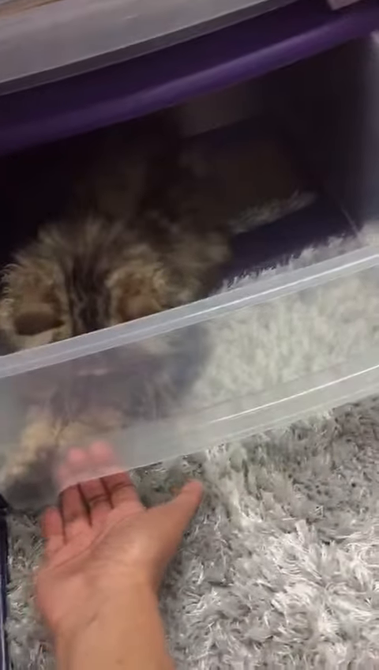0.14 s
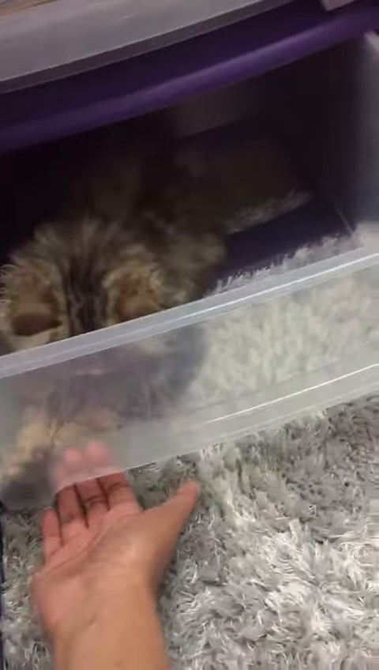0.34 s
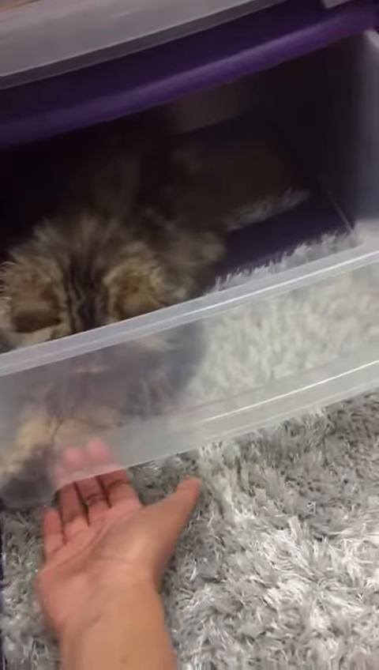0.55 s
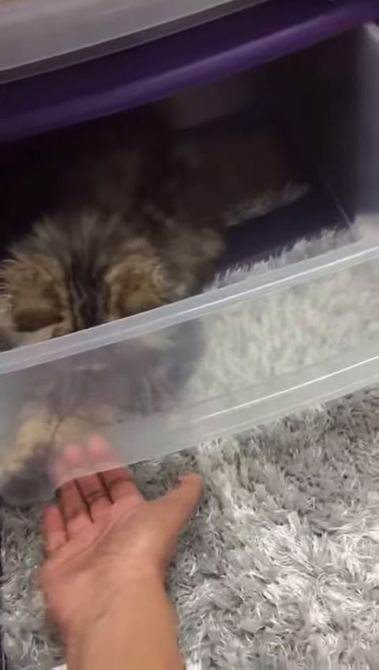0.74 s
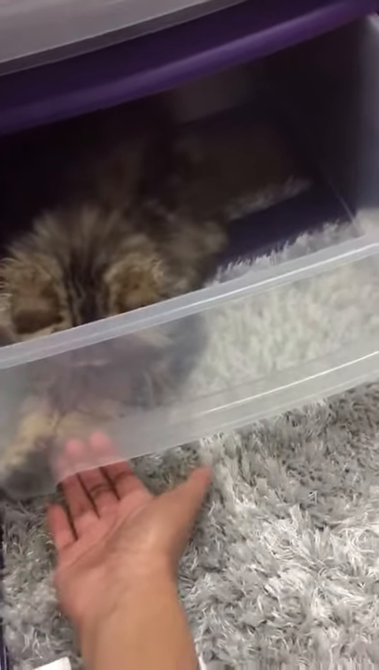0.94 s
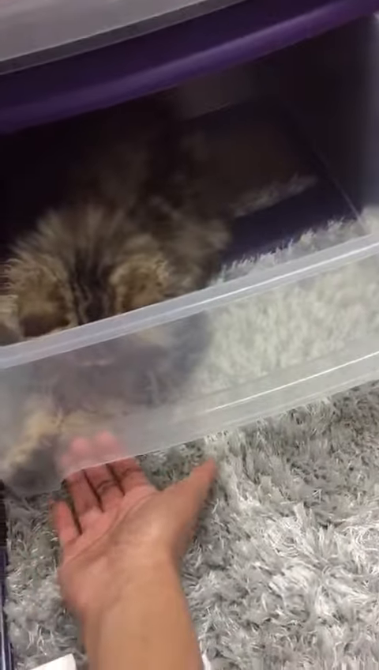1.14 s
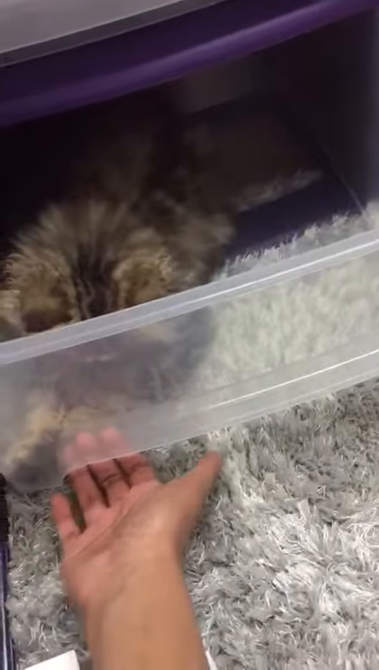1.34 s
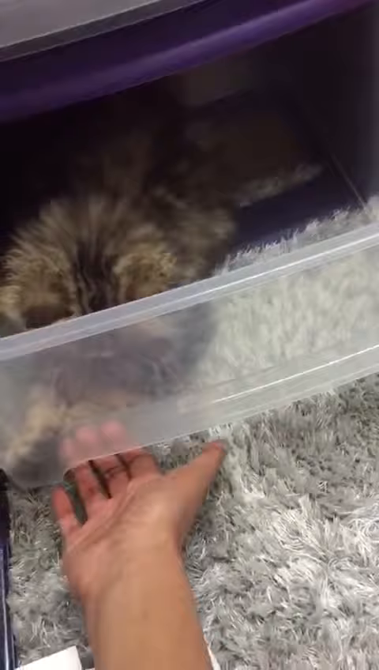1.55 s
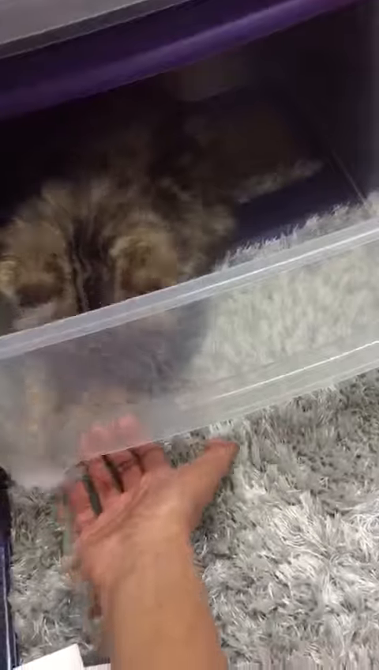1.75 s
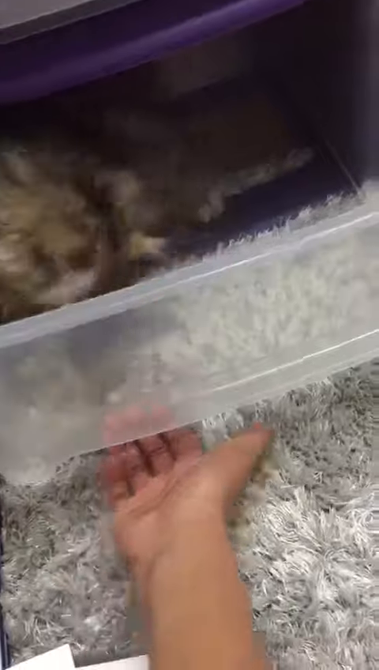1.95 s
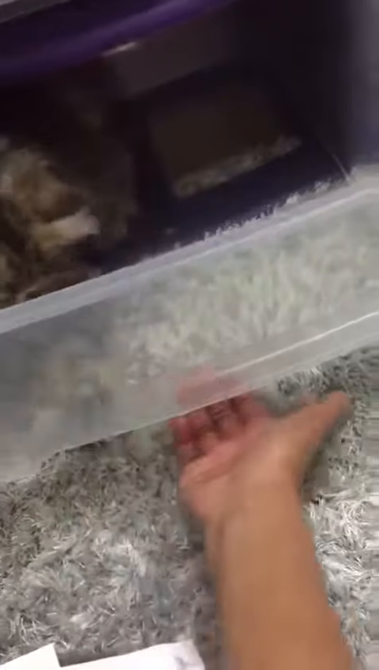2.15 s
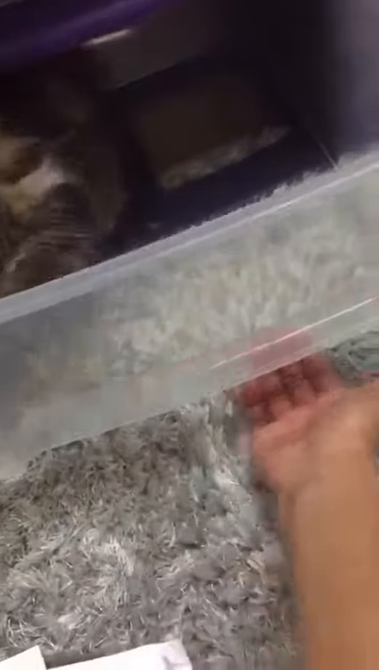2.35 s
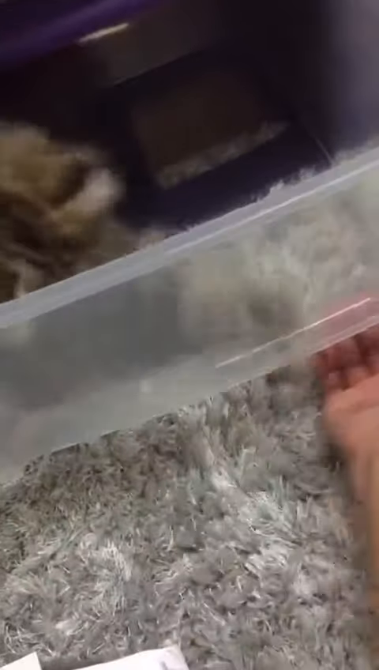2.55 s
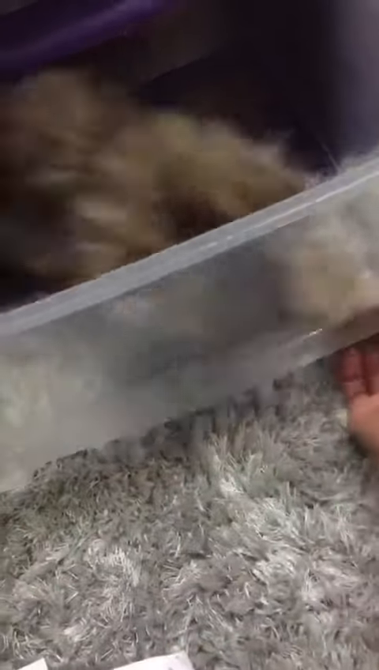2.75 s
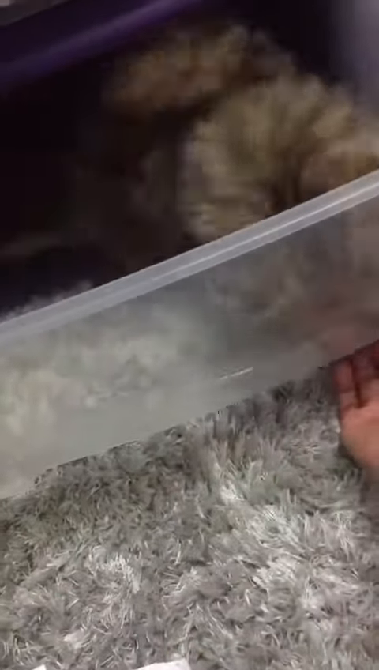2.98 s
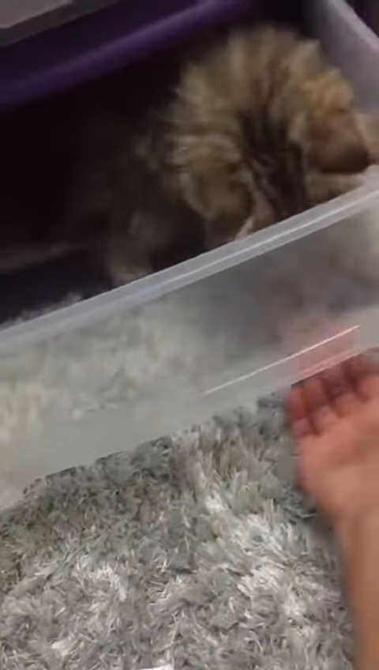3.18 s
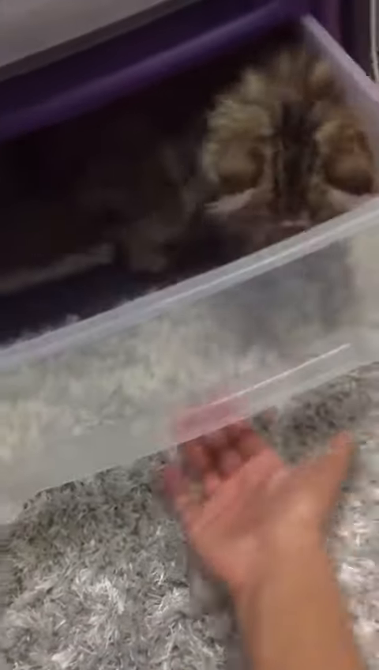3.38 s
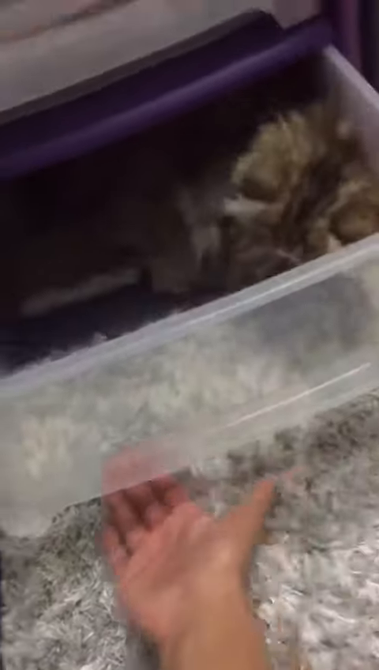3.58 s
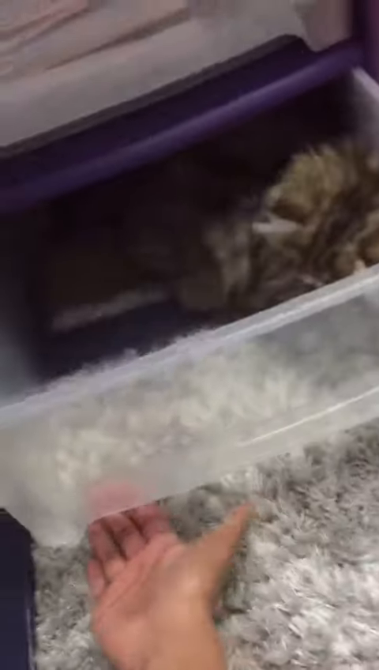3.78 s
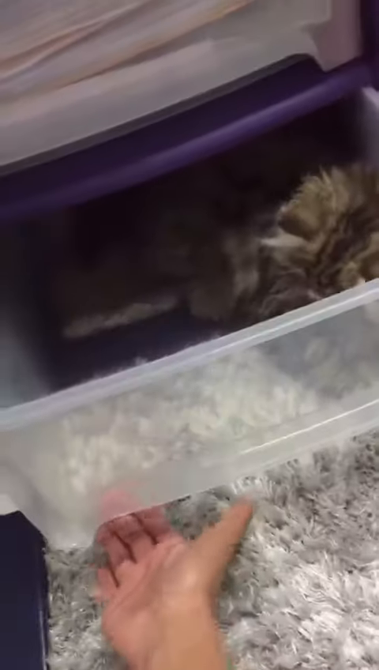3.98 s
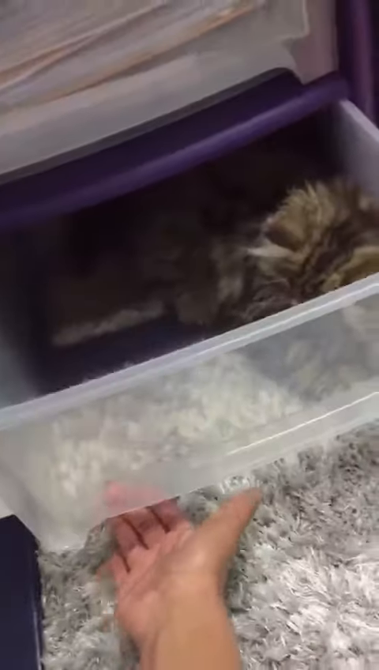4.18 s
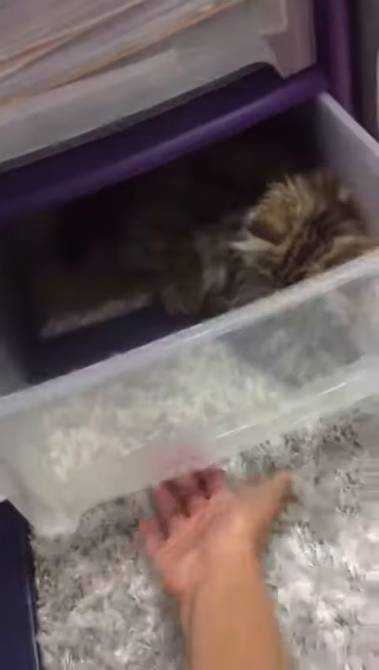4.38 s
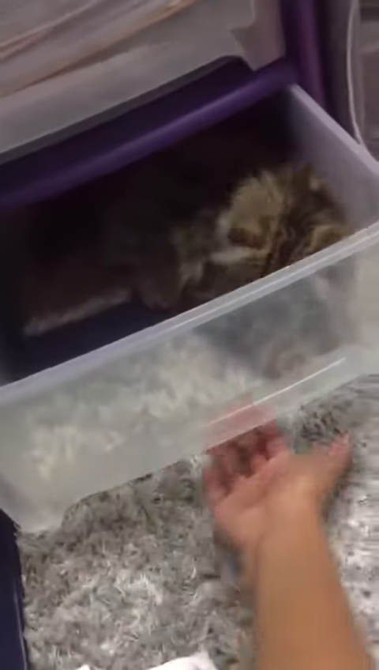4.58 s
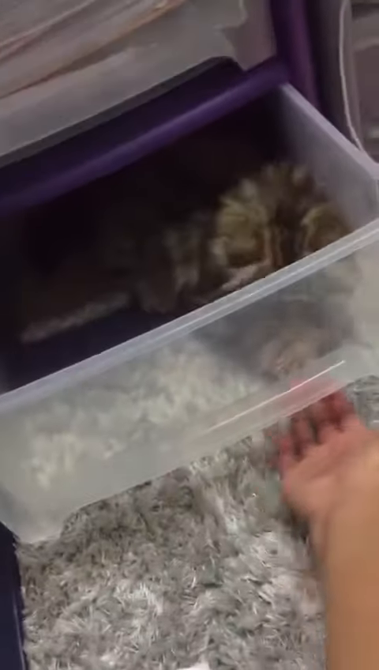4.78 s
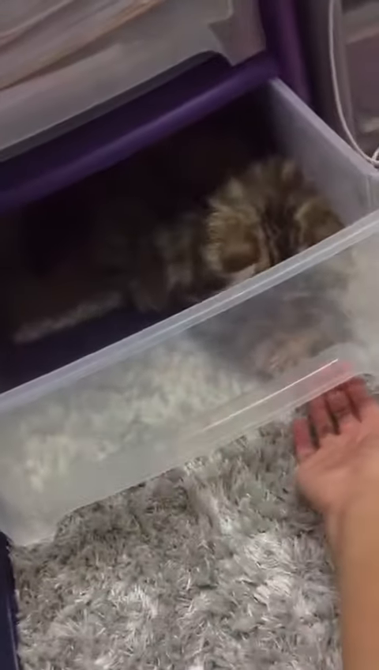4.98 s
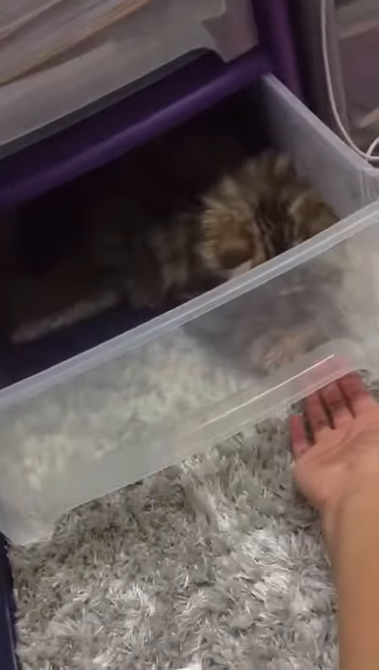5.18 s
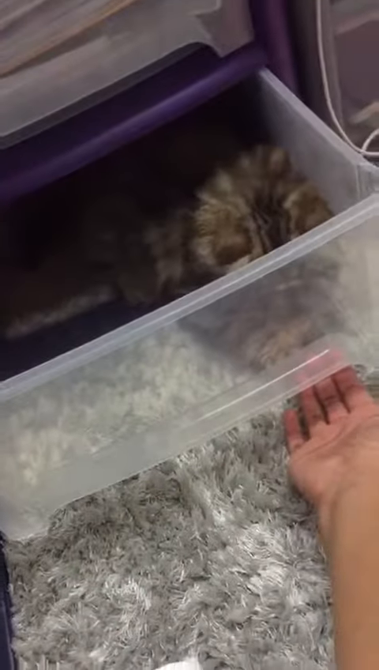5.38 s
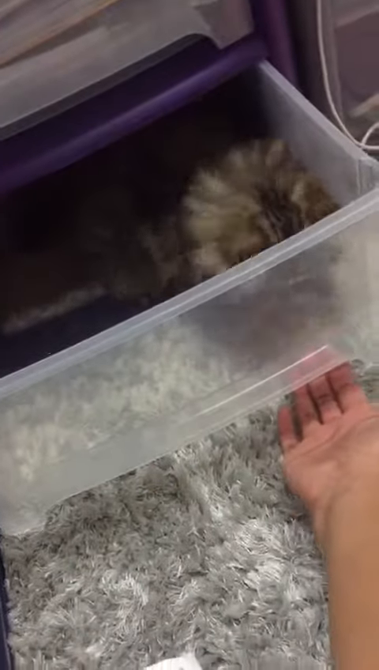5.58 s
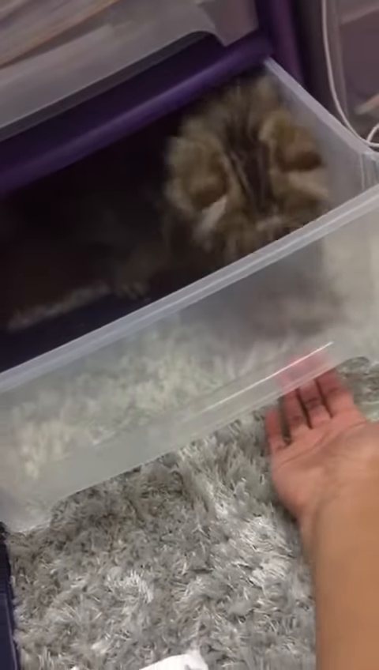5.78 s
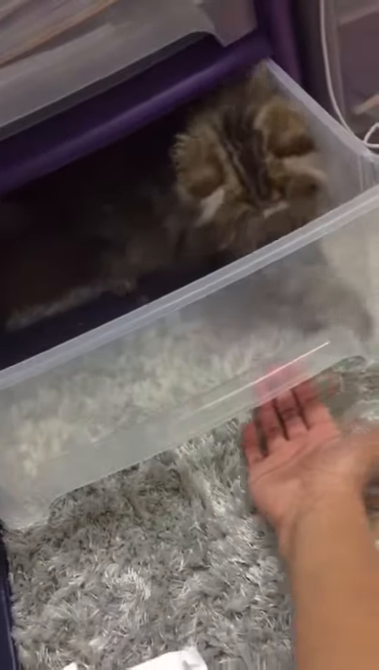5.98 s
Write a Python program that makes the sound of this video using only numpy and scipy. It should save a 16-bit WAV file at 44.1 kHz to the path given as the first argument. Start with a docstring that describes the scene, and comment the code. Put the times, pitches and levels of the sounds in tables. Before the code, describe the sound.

Fingertips drum hollow knocks on a plastic drawer front while a kitten inside answers with soft paw thumps and quick claw ticks in a quiet room.

```python
"""In a small furnished room, fingers drum on the front of a clear plastic drawer that stands open on a carpet.
Taps ring the modes of the front, with a nail click on top, and bending waves make each one chirp down.
A kitten inside pounces after them: paws thump the drawer floor, claws tick on the wall as short noise bursts,
its shifting weight rumbles and scrapes, and fur hisses along the plastic. The harder a contact, the brighter.
The room answers each tap, claw and pawfall briefly, above quiet air and a faint hum."""
import sys
import numpy as np
from scipy import signal
from scipy.fft import rfft, irfft, next_fast_len
from scipy.io import wavfile
from scipy.ndimage import map_coordinates

SR = 44100
rng = np.random.default_rng(int(sys.argv[2]) if len(sys.argv) > 2 else 0)


def dump_mix(stems):
    """Bounce the given channels to the path in sys.argv[1] as a 16-bit WAV at rate SR."""
    frames = np.atleast_2d(stems).T  # one column per channel
    limited = np.clip(frames, -1, 1)  # hard clip at full scale
    pcm = np.round(limited * 32767).astype(np.int16)
    wavfile.write(sys.argv[1], SR, pcm)


N = 265919
AGE = np.arange(SR // 4) / SR  # time since a contact, s
TOP_HZ = 11900  # upper band limit

# finger taps on the drawer front, by soft pad or hard nail:
# [t/s, strength/dB, hardness/(dB per octave), spot level/dB]
FINGER_TAPS = [(1.514, -47.5, .3, 2), (1.652, -31, .3, 0), (1.768, -22.5, 0.45, -0.5), (1.873, -30, 1.6, 3),
               (1.973, -18, 0, 1), (2.068, -19, -4, -8), (2.167, -17, -1, 0.5), (2.219, -31.5, -1.5, -2),
               (2.341, -18.5, -2, 2), (2.531, -16.5, 1.15, -3), (2.89, -21.5, 2.5, 0),
               (3.101, -17.5, 0.33, -3), (3.477, -16.5, 0, 4.5), (3.708, -18.5, 1.25, 2),
               (3.919, -22.5, 3, 0.5), (4.154, -18.5, 2, -4), (4.415, -22, -7, -15),
               (4.641, -16, -3.5, 0.5), (4.734, -38.5, -7, 3)]
# modes of the drawer front: [nominal f/Hz, mean level/dB, t60/s]
FRONT_MODES = [(119.7, -14.5, 0.14), (193, -14, 0.027), (378.5, 1, 0.039), (406.5, -21, 0.19),
               (516, -31, 0.024), (657, 1, 0.02), (661.7, -19.5, 0.13), (814, -13, 0.012),
               (850, -28.5, 0.11), (864, 1.5, 0.015), (1428, -5, 0.014), (1650, -9, 0.018),
               (2045, 1.5, 0.01), (2260, -5, 0.01), (2950, -4, 0.0071)]
# force of an average finger tap: [f/Hz, level/dB]
FINGER_FORCE = [(400, 5), (650, -0.5), (1000, -3.5), (1500, -6), (2500, -5.5)]
# spectrum shape of a nail click: [f/Hz, level/dB]
NAIL_SPECTRUM = [(600, -7.5), (1500, 3), (2150, 3.5), (2550, -15), (3200, -0.5), (4500, -1.5), (6500, 1),
                 (8500, -7), (11500, -11.5)]
# the spot that is hit favours or starves the panel modes in this range
SPOT_LOW_HZ, SPOT_HIGH_HZ = 520, 1200
# click level against the knock; dB it gains per unit of hardness (octaves above the knock)
NAIL_DB, NAIL_OCTAVES = -9.5, 2.7
NAIL_TILT_SHARE = 0.47  # share of the hardness that also tilts the click's own spectrum


def finger_taps():
    """Modal excitation: a thin panel knocks hollowly, weighted by the spot hit, under a nail click."""
    track = np.zeros(N)
    for s, db, hardness, spot_db in FINGER_TAPS:
        force = []
        for hz, level in hardened(FINGER_FORCE, hardness, pivot_hz=395):
            near_spot = SPOT_LOW_HZ < hz < SPOT_HIGH_HZ
            force.append((hz, level + spot_db * near_spot))
        knock = ring(FRONT_MODES, force, scatter_db=1.5, detune=0.012, swell=0.046)
        nail = hardened(NAIL_SPECTRUM, NAIL_TILT_SHARE * hardness, pivot_hz=4000)
        click = amp(NAIL_DB + NAIL_OCTAVES * hardness) * crack(nail, t60=0.016)
        add(track, s, amp(db) * in_room(knock + click, wet_db=0.5))
    return bending(track, lag=0.001652)


# paws landing on the drawer floor: [t/s, strength/dB, hardness/(dB per octave)]
PAWFALLS = [(1.018, -39, -0.5), (1.13, -46, 1.5), (1.172, -48, 2), (1.73, -39, -1.5), (2.223, -42, -14),
            (2.321, -29, 0), (2.444, -36.5, -1), (2.617, -21.5, 3), (2.643, -23, 2), (2.677, -25, -1),
            (2.847, -17.5, 2.5), (2.87, -20, 0), (3.045, -26, -1), (3.388, -41.5, -4.5),
            (3.82, -31.5, -2.5), (3.959, -33.5, 3.5), (4.043, -33.5, -0.5), (4.098, -37, 7),
            (4.295, -28.5, -2), (4.366, -34.5, 2.5), (4.413, -37, -2), (4.784, -48, -2),
            (5.674, -28.5, 2.5), (5.702, -30.5, -1.5)]
# modes of the drawer floor and its cavity: [nominal f/Hz, mean level/dB, t60/s]
FLOOR_MODES = [(61.1, -16, 0.2), (105.5, 2, 0.15), (144.5, -2.5, 0.16), (186.8, -8, 0.21),
               (251, -0.5, 0.082), (323, -11.5, 0.14), (380.5, -7, 0.097), (453, -29, .04),
               (625, -14.5, 0.057), (896, -21.5, 0.042), (1093, -23.5, 0.025)]
# force of an average pawfall: [f/Hz, level/dB]
PAD_FORCE = [(62, 2.5), (105, 2.5), (140, 0), (240, -3.5)]


def paws():
    """Modal excitation: soft pads thump mainly the low modes of the drawer floor, and their force, level above
    240 Hz, also stirs its mid-range modes."""
    track = np.zeros(N)
    for s, db, hardness in PAWFALLS:
        force = hardened(PAD_FORCE, hardness, pivot_hz=125)
        thump = ring(FLOOR_MODES, force, scatter_db=1.5, detune=0.012, swell=0.014)
        add(track, s, amp(db) * in_room(thump, wet_db=1))
    return track


# the clearest claw strikes on the wall: [t/s, strength/dB, hardness/(dB per octave)]
CLAW_STRIKES = [(1.5615, -54, 0.5), (1.704, -49.5, -3.5), (1.8017, -44, 0.5), (1.851, -59, 9.5),
                (1.8619, -47, 5.5), (1.967, -32, 2), (2.0363, -27.5, 0.5), (2.129, -33, 1.5),
                (2.3219, -39.5, -0.5), (2.4026, -34, -1), (2.505, -41, -5), (2.6177, -29, 1.2),
                (2.6391, -33.5, -1), (2.6616, -30.5, 1.5), (2.6699, -25.5, 4.5), (2.8013, -37, -8),
                (2.823, -42.5, 1.5), (2.848, -23.5, 3), (3.002, -42, -2), (3.0209, -32.5, -13.5),
                (3.2518, -42, -6), (3.4469, -40.5, -3.5), (3.777, -44, -3), (3.992, -44, -4),
                (4.0389, -46.5, -10), (4.2736, -44.5, 2), (4.2965, -35.5, -1), (4.4102, -46.5, -4),
                (4.478, -57, -10), (4.5163, -54.5, -2.5), (4.7717, -55, -4), (5.639, -37, 0),
                (5.675, -36.5, -3), (5.7017, -37, -2.5), (5.817, -39, -3), (5.8284, -38, -1.5)]
# spectrum shape of the dry clack: [f/Hz, level/dB]
CLACK_SPECTRUM = [(200, -14), (400, 12), (520, 6.5), (900, 7.5), (1500, 3.5), (2200, -5.5), (4000, -44.5)]
# spectrum shape of the tick: [f/Hz, level/dB]
TICK_SPECTRUM = [(900, -22), (2000, -0.5), (3100, 5.5), (3700, -1.5), (4300, 0), (5500, -19), (11000, -42)]
# spectrum shape of the claw tip's bright edge: [f/Hz, level/dB]
TIP_SPECTRUM = [(3000, -5), (6200, 6), (8500, -7.5), (11500, -13.5)]
# each part's level, and octaves from the middle of the strike's spectrum (dB gained per unit of hardness)
CLACK_DB, CLACK_OCTAVES = 1, -0.95
TICK_DB, TICK_OCTAVES = -1.5, 1
TIP_DB, TIP_OCTAVES = -13.5, 2.63


def claws():
    """Short hard contact excites a wide band: a dry clack, a tick and a bright edge from the claw tip."""
    track = np.zeros(N)
    for s, db, hardness in CLAW_STRIKES + light_touches():
        tick = amp(TICK_DB + TICK_OCTAVES * hardness) * crack(TICK_SPECTRUM, t60=0.021)
        clack = amp(CLACK_DB + CLACK_OCTAVES * hardness) * crack(CLACK_SPECTRUM, t60=0.048)
        tip = amp(TIP_DB + TIP_OCTAVES * hardness) * crack(TIP_SPECTRUM, t60=0.012)
        add(track, s, amp(db) * in_room(tick + clack + tip, wet_db=1.5))
    return bending(track, lag=0.000774)


PATTER_PER_S = 8  # sets the number of stray touches
PATTER_DB, PATTER_SPREAD_DB = -5, 4  # their level against the movement
PATTER_HARDNESS, PATTER_HARDNESS_SPREAD = -2.5, 2.3  # dB per octave
PAW_CLAW_DB, PAW_CLAW_HARDNESS = -21.5, -6  # level against the pawfall; dB per octave


def light_touches():
    """Random contacts in rows like CLAW_STRIKES: one with every paw, and strays as loud as the movement allows."""
    level_db = movement_db()
    start, end = KITTEN_MOVEMENT[0][0], (N - 1) / SR
    count = int((end - start) * PATTER_PER_S)
    rows = [(s, db + PAW_CLAW_DB, PAW_CLAW_HARDNESS) for s, db, _ in PAWFALLS]
    for when, size, edge in rng.uniform(-0.87, 1, (count, 3)):
        s = start + (end - start) * (when + 1) / 2
        db = level_db[int(s * SR)] + PATTER_DB + PATTER_SPREAD_DB * size
        hardness = PATTER_HARDNESS + PATTER_HARDNESS_SPREAD * edge
        rows.append((s, db, hardness))
    return rows


# force of the shifting body on the drawer floor: [f/Hz, level/dB]
PRESS_FORCE = [(60, 13), (110, -3.5), (250, -5), (400, 0), (650, 4)]
# spectrum shape of the scraping paws: [f/Hz, level/dB]
SCRAPE_SPECTRUM = [(300, -5.5), (900, 4), (2000, 10), (4000, -3.5), (8000, -10.5), (12000, -11.5)]
RUMBLE_DB = -0.5  # against the movement
LURCH_DB, LURCH_PER_S = 3, 9  # uneven surges of the movement: depth, and knots per second
SCRAPE_DB, SCRAPE_GROWTH = -33, 0.72  # the scrape grows more slowly than the rumble, in dB per dB


def shuffle():
    """Stick-slip friction: shifting weight rumbles on the drawer floor and the paws scrape."""
    effort_db = movement_db() + LURCH_DB * wobble(LURCH_PER_S)
    floor = ring(FLOOR_MODES, PRESS_FORCE, scatter_db=1.5, detune=0.0093, swell=0.014)
    rumble = unit(signal.fftconvolve(slips(rate=130, spread_db=0), floor)[:N])
    rasp = coloured(slips(rate=2100, spread_db=-0.5), SCRAPE_SPECTRUM)
    scrape = unit(amp(4.6 * wobble(50)) * rasp)
    return amp(RUMBLE_DB + effort_db) * rumble + amp(SCRAPE_DB + SCRAPE_GROWTH * effort_db) * scrape


# how much the kitten shifts about in the drawer: [t/s, movement level/dB]
KITTEN_MOVEMENT = [(1.74, -74), (1.95, -54), (2.08, -44), (2.29, -56.5), (2.55, -51.5), (2.66, -41),
                   (2.76, -53.5), (2.86, -40.5), (3.07, -45.5), (3.26, -54), (3.39, -44), (3.56, -54.5),
                   (3.77, -46.5), (3.98, -43.5), (4.21, -51), (4.38, -43.5), (4.52, -57.5), (4.95, -68),
                   (5.59, -83), (5.66, -46), (5.84, -55.5), (5.95, -74)]


def movement_db():
    """Linear interpolation of the kitten's movement level, one value per sample."""
    return np.interp(np.arange(N) / SR, *np.transpose(KITTEN_MOVEMENT))


# fur brushing along the wall: [start t/s, length/s, level/dB]
FUR_BRUSHES = [(2.766, 0.099, -70), (3.312, 0.13, -58), (3.522, .22, -66.5), (4.26, 0.24, -71.5)]
# spectrum shape of the fur's hiss: [f/Hz, level/dB]
FUR_SPECTRUM = [(1500, -23), (3500, 0), (4500, 1), (6000, 0.5), (9000, -4.5), (12000, 0)]


def fur():
    """Amplitude-modulated noise: each brush on the plastic is a fluttering hiss that swells and fades."""
    brush = np.zeros(N)
    for s, length, db in FUR_BRUSHES:
        swell = np.sqrt(np.hanning(int(length * SR)).clip(0))
        add(brush, s, amp(db) * swell)
    return brush * unit(amp(2.1 * wobble(70)) * noise(FUR_SPECTRUM))


# spectrum shape of the indoor air: [f/Hz, level/dB]
AIR_SPECTRUM = [(25, -17), (40, -8.5), (70, 0.5), (100, -9), (125, -9.5), (165, -4.5), (230, -15.5),
                (400, -17), (700, -18.5), (900, -20), (1800, -22), (9000, -31.5), (12500, -36.5)]
AIR_DB = -67.5
HUM_HZ, HUM_DB = 100.5, -69.5  # centre of the wavering pitch and level


def room_tone():
    """Stationary noise and a modulated sinusoid: quiet indoor air with a faint wavering hum."""
    hum = np.sin(2 * np.pi * HUM_HZ * np.arange(N) / SR + 0.69 * wobble(4.3))
    return amp(AIR_DB) * noise(AIR_SPECTRUM) + amp(HUM_DB + 3 * wobble(4)) * hum


# decay time of the room: [f/Hz, t60/s]
ROOM_DECAY = [(100, 0.14), (400, 0.17), (1400, 0.15), (4000, 0.14), (10000, 0.2)]
# colour of the room's answer: [f/Hz, level/dB]
ROOM_COLOUR = [(100, -8.5), (400, -13), (800, -10), (2000, -11.5), (6000, -12), (11000, -15)]
# reflections from the drawer walls and the cabinet: [nominal delay/s, gain]
NEAR_ECHOES = [(.0027, 0.17), (.0052, 0.15), (0.018, 0.035)]


def in_room(hit, wet_db, build=0.0065, ripple_db=2):
    """Early reflections and diffuse decay: near echoes, then a tail in which some pitches stand out."""
    hz, t, z = signal.stft(rng.standard_normal(len(AGE)), SR, nperseg=256)
    ripple = ripple_db * rng.standard_normal((len(hz), 1))
    decay_db = -60 * t / along(ROOM_DECAY, hz)[:, None]
    tail = signal.istft(z * amp(ripple + decay_db), SR, nperseg=256)[1][:len(AGE)]
    tail = tail * (1 - np.exp(-(AGE / build) ** 2))
    answer = coloured(coloured(tail / np.linalg.norm(tail), ROOM_COLOUR), radiated(hit))
    sound = hit + amp(wet_db) * answer
    for delay, gain in NEAR_ECHOES:
        add(sound, delay * rng.uniform(0.77, 1.3), gain * hit)  # paths differ with the contact point
    return sound


def radiated(hit, count=42):
    """Radiated power averaged in bands, as (Hz, dB): the fine ripple of any one direction averages away."""
    edges = np.round(np.geomspace(40, 16000, count) * len(hit) / SR).astype(int)
    power = np.add.reduceat(np.abs(rfft(hit)) ** 2, edges)[:-1] / np.diff(edges)
    centre_hz = (edges[:-1] + edges[1:]) / 2 * SR / len(hit)
    return np.column_stack([centre_hz, 10 * np.log10(power + 1e-20)])


def ring(modes, force, scatter_db, detune, swell):
    """Modal superposition: damped modes driven by a force spectrum, weighted anew at each contact point."""
    hz, db, t60 = np.transpose(modes)
    level = amp(db + along(force, hz) + scatter_db * rng.standard_normal(len(hz)))
    pitch = hz * (1 + detune * rng.standard_normal(len(hz)))
    sign = (-1) ** np.arange(len(hz))  # neighbouring modes swing in opposite senses
    life = AGE / t60[:, None]
    envelope = amp(-60 * life) * (1 - np.exp(-life / swell))  # long-lived modes also fill slowly
    return (sign * level) @ (np.sin(2 * np.pi * np.outer(pitch, AGE)) * envelope)


def crack(spectrum, t60):
    """High modal density: decaying noise stands for many modes, with the energy of 1 ms at level 1."""
    burst = coloured(rng.standard_normal(len(AGE)) * amp(-60 * AGE / t60), spectrum)
    return burst / np.linalg.norm(burst) * np.sqrt(SR / 1000)


def bending(x, lag):
    """Dispersion: bending waves travel as the root of frequency, so contacts chirp down; lag is s at 1 kHz."""
    # the highest waves arrive first and mark the moment of contact
    lead = lag * np.sqrt(1000 / TOP_HZ)
    return filtered(x, lambda hz: np.exp(-2j * np.pi * (2 * lag * np.sqrt(1000 * hz) - lead * hz)))


def hardened(force, hardness, pivot_hz):
    """Contact stiffness: a force spectrum tilted about the pivot, by hardness dB per octave."""
    return [(hz, db + hardness * np.log2(hz / pivot_hz)) for hz, db in force]


def slips(rate, spread_db):
    """Poisson-like stick-slip: tiny impulses of either sign, rate a second, sizes spread in dB."""
    moments = rng.random(N) < rate / SR
    return moments * rng.choice([-1, 1], N) * amp(spread_db * rng.standard_normal(N))


def noise(spectrum):
    """Spectral shaping: steady coloured noise of rms 1."""
    return unit(filtered(rng.standard_normal(N), lambda hz: amp(along(spectrum, hz))))


def wobble(rate):
    """Band-limited fluctuation: a smooth random curve, rate knots a second."""
    return map_coordinates(rng.standard_normal(int(N * rate / SR) + 4), [np.arange(N) * rate / SR])


def coloured(x, spectrum, size=2048):
    """Minimum phase: a causal filter with the given spectrum keeps attacks sharp."""
    cepstrum = irfft(np.log(amp(along(spectrum, np.fft.rfftfreq(size, 1 / SR)))))
    cepstrum[1:size // 2] *= 2  # fold the cepstrum onto positive times
    cepstrum[size // 2 + 1:] = 0
    return signal.fftconvolve(x, irfft(np.exp(rfft(cepstrum))))[:len(x)]


def filtered(x, response):
    """Linear filtering: the spectrum of x times a complex response of frequency."""
    size = next_fast_len(len(x) + 8192)
    return irfft(rfft(x, size) * response(np.fft.rfftfreq(size, 1 / SR)), size)[:len(x)]


def along(points, hz):
    """Logarithmic frequency scale: (Hz, value) points interpolated on a log axis."""
    f, v = np.transpose(points)
    return np.interp(np.log(hz + 1), np.log(f), v)


def add(track, s, hit):
    """Superposition: mix a hit into the track at time s."""
    part = track[round(s * SR):][:len(hit)]
    part += hit[:len(part)]


def unit(x):
    """Normalisation: scale to rms 1."""
    return x / np.sqrt(np.mean(x ** 2) + 1e-20)


def amp(db):
    """Level law: decibels to gain."""
    return 10 ** (np.asarray(db) / 20)


def scene():
    """Superposition of hand, kitten and room at one microphone."""
    return (finger_taps() + paws() + claws() + shuffle() + fur() + room_tone())[None]


LOW_CUT_HZ = 36


def record(dry):
    """Band limitation: the microphone sheds the deep bass, and a steep edge ends the treble at TOP_HZ."""
    high_pass = signal.butter(2, LOW_CUT_HZ, "highpass", fs=SR, output="sos")
    sound = signal.sosfilt(high_pass, dry[0])
    return filtered(sound, lambda hz: 1 / np.sqrt(1 + (hz / TOP_HZ) ** 120))[None]


dry = scene()
out = record(dry)
dump_mix(out)
```